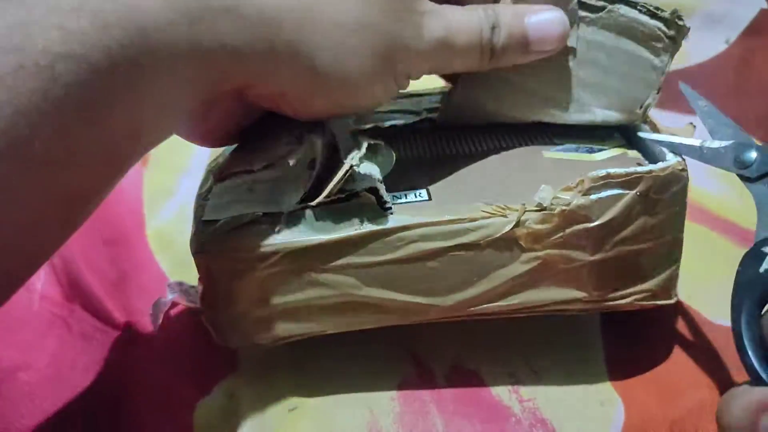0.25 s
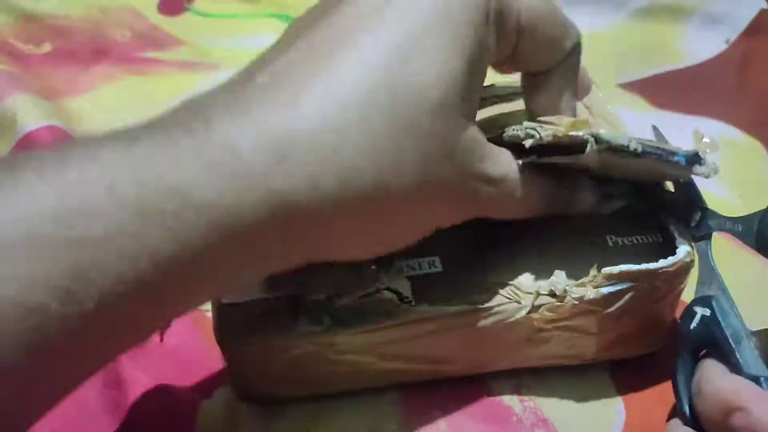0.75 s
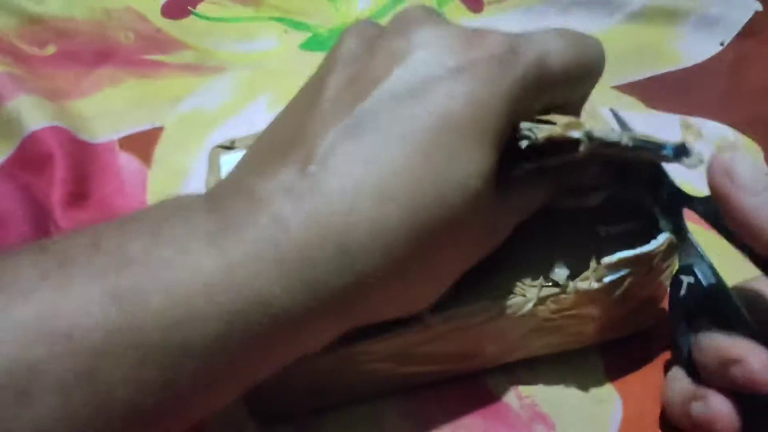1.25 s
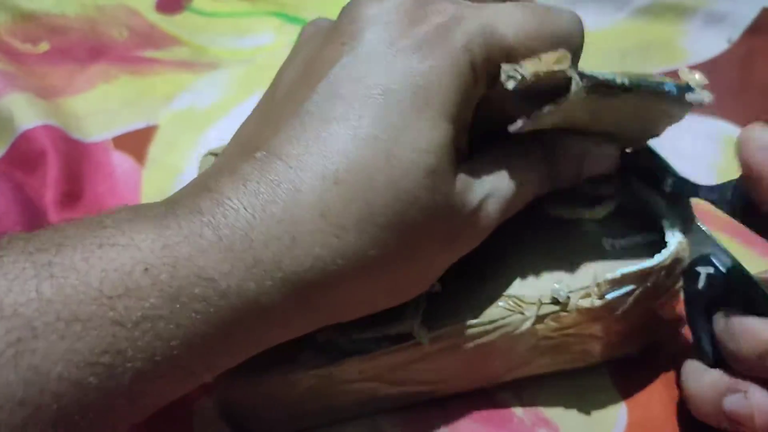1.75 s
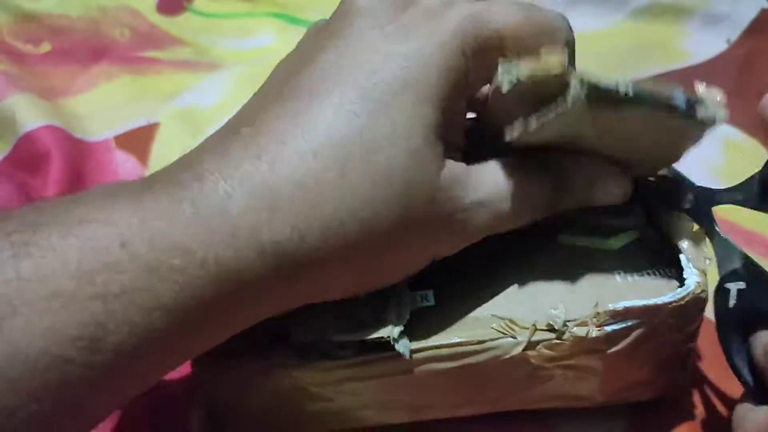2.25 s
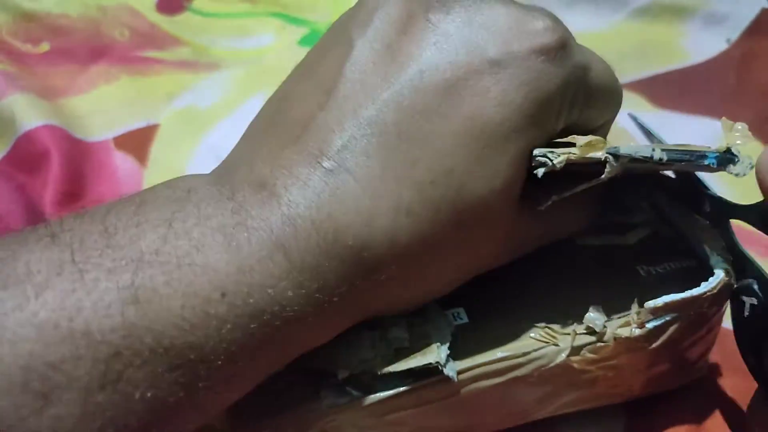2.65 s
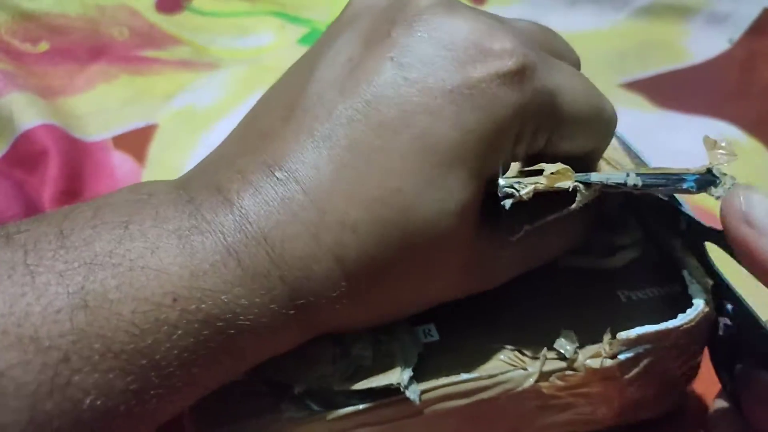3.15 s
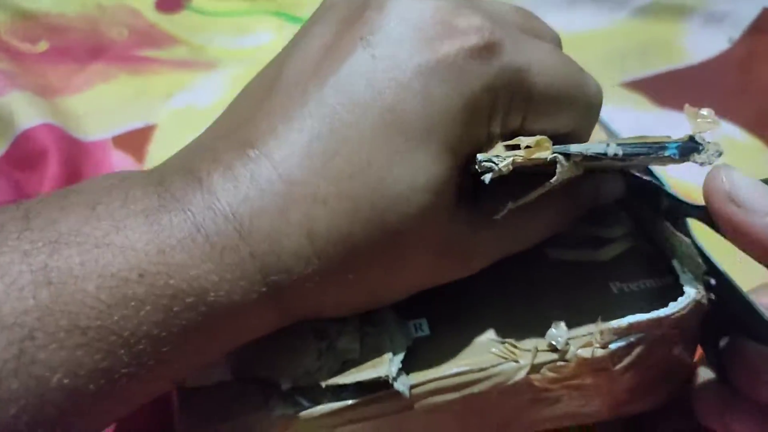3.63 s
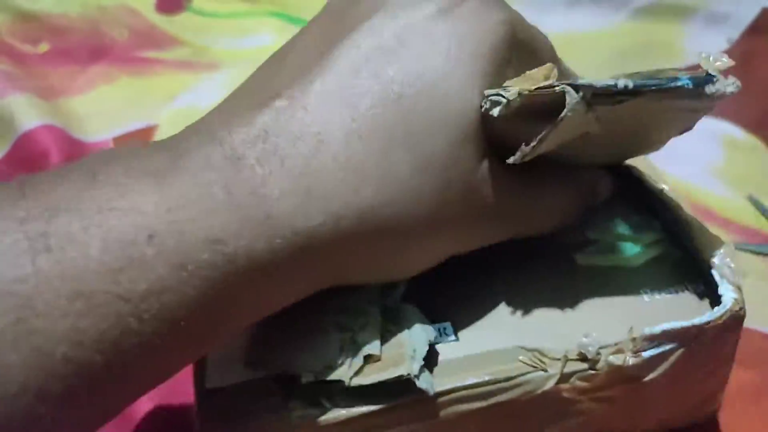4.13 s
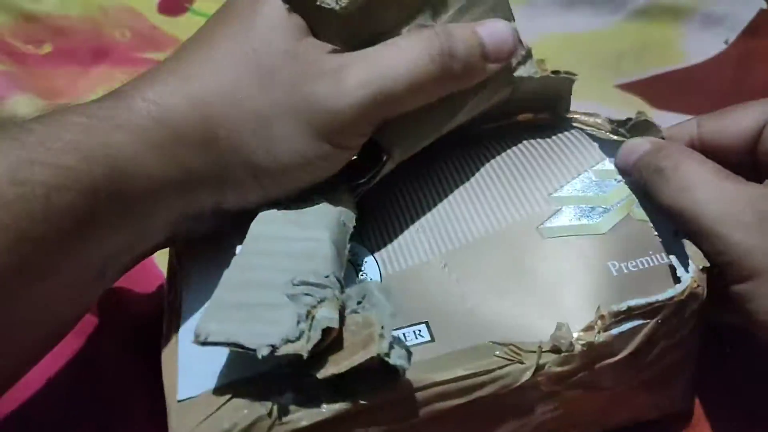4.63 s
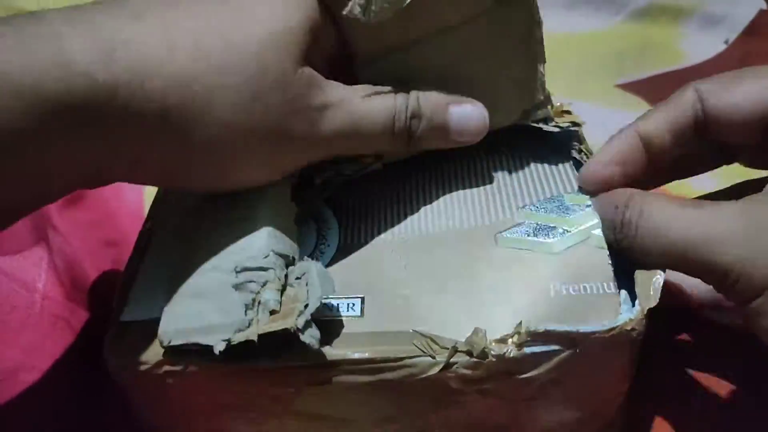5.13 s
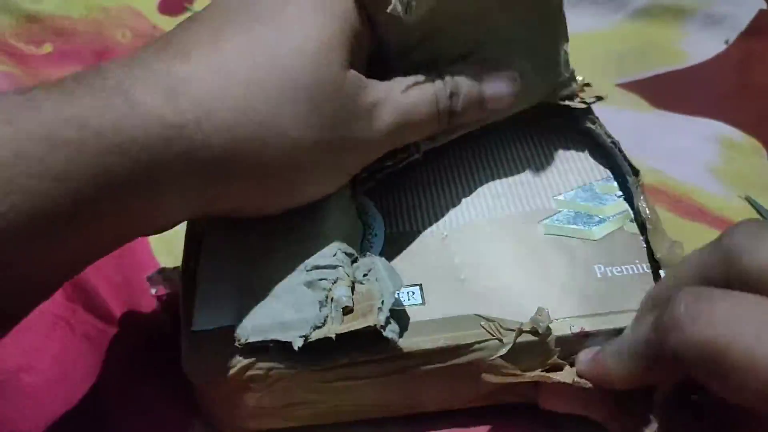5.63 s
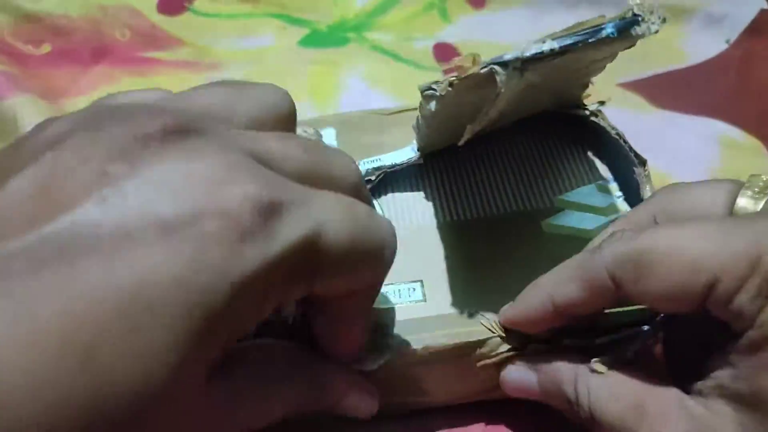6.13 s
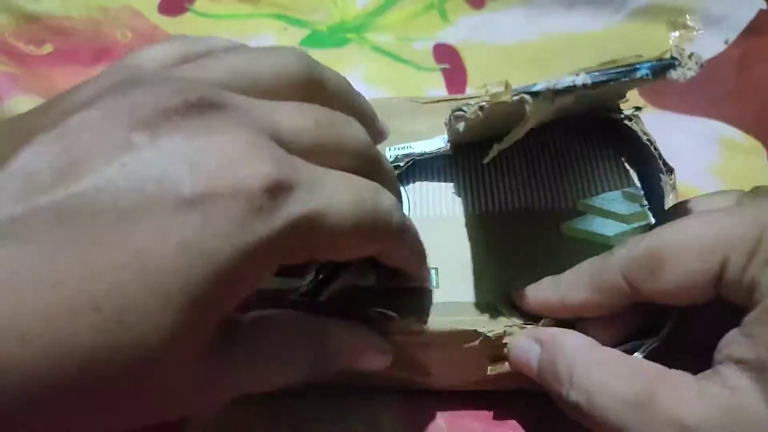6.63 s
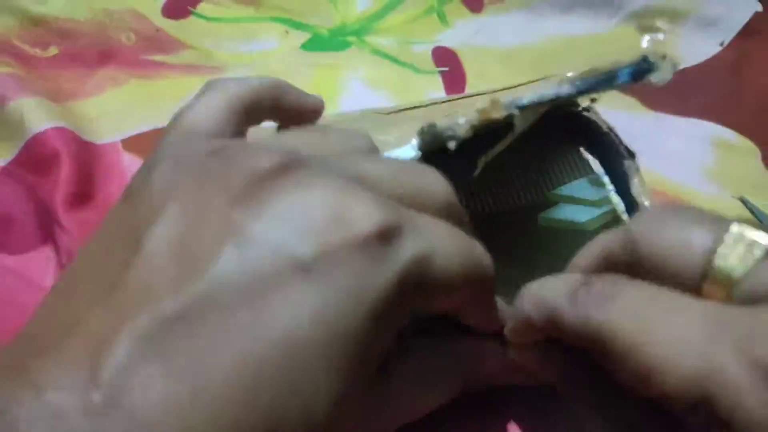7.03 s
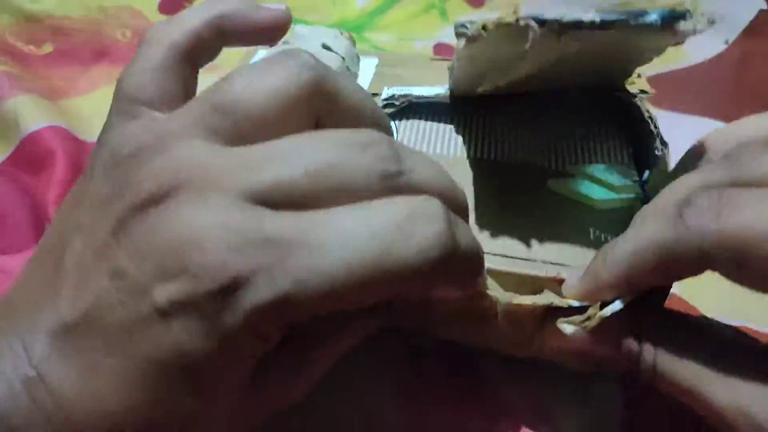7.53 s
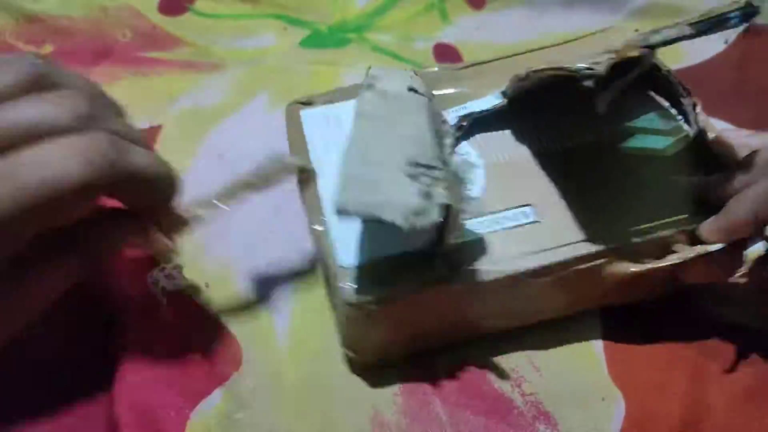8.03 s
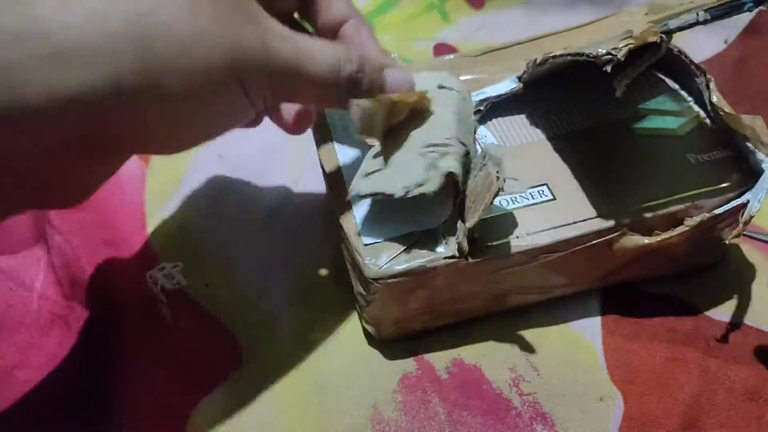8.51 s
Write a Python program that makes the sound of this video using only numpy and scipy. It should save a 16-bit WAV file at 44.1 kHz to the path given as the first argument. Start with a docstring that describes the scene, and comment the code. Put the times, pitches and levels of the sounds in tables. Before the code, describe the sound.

Hands pull apart a small taped cardboard parcel up close: faint rubbing, then sharp tape snaps, short crackling rips and dull box bumps in irregular bursts.

```python
"""A small taped cardboard parcel on a bed is pulled open by hand, close to a phone with two microphone ports.
Rips and rubs are trains of tiny fractures ringing tape film and box; snaps, ticks and knocks are short rings.
Crinkles buckle in quick steps, bumps thud the box wall and its air, a freed flap twangs once as a sine.
Behind them: a short diffuse tail of a small soft room and faint steady coloured noise."""
import sys
import numpy as np
from scipy import signal
from scipy.fft import rfft, irfft, next_fast_len
from scipy.io import wavfile
from scipy.ndimage import uniform_filter1d

SR = 44100
rng = np.random.default_rng(int(sys.argv[2]) if len(sys.argv) > 2 else 0)


def inscribe(sig):
    """Save sig as 16-bit PCM at rate SR to the path in sys.argv[1].

    A 1-D sig is mono; a 2-D sig holds one channel per row.
    Samples are clipped to [-1, 1] before scaling.
    """
    pcm = np.round(np.clip(np.atleast_2d(sig).T, -1, 1) * 32767)
    wavfile.write(sys.argv[1], SR, pcm.astype(np.int16))


N = 386757
TIME_S = np.arange(N) / SR
TOP_HZ = 16100

# cracks running through tape and board: start_s, rise_s, fall_by_20_db_s, tape_db, board_db
RIP_EVENTS = [(1.542, 0.01, 0.05, -42, -42.5), (1.625, 0.0086, 0.08, -44, -48),
              (2.14, 0.02, 0.0363, -52, -46), (2.323, 0.013, 0.02, -46.5, -46.5),
              (3.8, 0.021, 0.0937, -31.5, -29.5), (4.334, 0.089, 0.1546, -37, -51),
              (4.496, 0.053, 0.0346, -30, -34), (5.428, 0.013, 0.1, -33.5, -43),
              (5.485, 0.012, 0.065, -33.5, -37.5), (6.534, .003, 0.065, -40.5, -36),
              (7.498, 0.011, 0.0659, -33.5, -50.5), (7.707, 0.051, 0.0539, -26.5, -38),
              (7.875, 0.014, 0.0958, -33, -36), (8.045, 0.026, 0.0374, -39, -35.5)]
# single snaps of tape and creased board: time_s, tape_db, board_db
SNAP_EVENTS = [(1.3845, -42, -69), (1.4385, -49, -45), (1.9025, -38.5, -42.5), (1.974, -47, -40),
               (2.014, -48.5, -55.5), (2.136, -46, -48), (2.18, -52, -59), (2.394, -47.5, -57),
               (2.903, -46, -52.5), (3.4068, -50, -48), (3.505, -58, -44), (3.7847, -41.5, -45),
               (3.8233, -24, -25), (3.847, -38, -28.5), (4.3213, -37.5, -43), (4.5185, -24.5, -40.5),
               (4.524, -23.5, -40), (4.5662, -32.5, -42), (4.6443, -40.5, -53), (4.696, -37, -47.5),
               (4.848, -54, -59), (5.001, -49, -49), (5.1891, -38.5, -51), (5.263, -47, -39.5),
               (5.381, -52, -40), (5.407, -39, -38), (5.4323, -19.5, -27), (5.4924, -25.5, -25.5),
               (5.98, -38, -44.5), (6.056, -44, -45.5), (6.36, -45.5, -49.5), (6.4195, -37, -51.5),
               (6.469, -39, -55.5), (6.757, -44, -52), (6.826, -52.5, -54), (7.056, -39, -61),
               (7.219, -33, -58), (7.2938, -36.5, -39), (7.5697, -23, -48), (7.639, -17.5, -40),
               (7.745, -22.5, -48), (7.7569, -21, -32.5), (7.8897, -23.5, -32), (8.0671, -36, -34)]
# resting hands, as level of their faint rub: time_s, tape_db, board_db
GRIP_LEVELS = [(0, -68, -60.5), (.46, -80, -86), (0.619, -100, -100), (0.657, -65.5, -68),
               (1.499, -64.5, -64.5), (1.78, -74.5, -68), (2.0, -60.5, -56), (2.29, -78.5, -93),
               (2.359, -67, -57), (2.8, -67.5, -71.5), (3.7, -67.5, -69), (4.5, -61.5, -61),
               (5.6, -69, -66), (5.84, -66, -68.5), (7.45, -67, -71), (7.901, -55, -55),
               (8.33, -63.5, -70.5)]
# finger slipping over tape and board: start_s, length_s, tape_db, board_db
STROKE_EVENTS = [(0.107, 0.068, -72, -57.5), (0.295, 0.13, -64, -53), (0.743, 0.064, -50, -57),
                 (0.83, 0.15, -52, -62), (1.323, 0.14, -55.5, -66), (1.82, 0.17, -64, -67),
                 (2.804, 0.069, -50.5, -62), (2.946, 0.051, -53.5, -55), (3.03, 0.097, -57, -81),
                 (3.209, 0.083, -58, -55.5), (3.355, 0.088, -58.5, -56.5), (3.489, 0.079, -56, -57),
                 (4.07, 0.079, -56, -53), (4.66, 0.072, -50.5, -58), (4.786, 0.24, -59, -52),
                 (5.011, 0.15, -58.5, -54), (5.116, 0.039, -56, -52.5), (5.188, 0.1, -52, -45.5),
                 (5.348, 0.077, -50, -50.5), (5.552, 0.073, -38, -45.5), (5.72, 0.061, -45, -50.5),
                 (5.951, 0.0805, -53.5, -52.5), (6.148, 0.094, -49, -51), (6.238, 0.12, -46.5, -43),
                 (6.356, 0.069, -48.5, -63.5), (6.676, 0.068, -49, -56), (6.892, 0.092, -56, -54.5),
                 (7.217, 0.07, -50.5, -62), (7.271, 0.085, -51.5, -53), (7.601, 0.15, -47.5, -57),
                 (8.387, 0.058, -54.5, -68.5), (8.554, 0.065, -48, -59.5), (8.69, 0.092, -54, -62)]
# thin ticks of loose tape film, board still: time_s, level_db
TICK_EVENTS = [(0.919, -46), (2.786, -53), (3.154, -53.5), (3.541, -51), (4.4218, -36.5), (5.477, -31),
               (5.5404, -36), (5.7143, -35), (5.9415, -40), (6.191, -44), (6.3975, -44), (6.664, -36.5),
               (7.2675, -48), (7.451, -54), (8.051, -38), (8.3113, -44), (8.5904, -40), (8.7245, -46.5)]
# dull knocks and creaks of the board under a fingertip: time_s, level_db
KNOCK_EVENTS = [(0.809, -53.5), (1.72, -50), (1.937, -46.5), (2.065, -47.5), (2.083, -49.5), (2.345, -36.5),
                (2.507, -50), (3.013, -53.5), (3.666, -45.5), (4.805, -50), (5.2, -37.5), (5.332, -48),
                (6.011, -46), (6.768, -48), (7.106, -51.5), (7.161, -49), (7.336, -44.5), (8.164, -46.5),
                (8.2444, -42)]
# soft bumps of the box: time_s, level_db
BUMP_EVENTS = [(1.026, -49), (1.122, -55), (1.176, -48), (1.551, -42), (1.635, -48.5), (2.900, -48.5),
               (3.828, -37), (4.088, -47), (4.172, -50), (4.587, -42), (6.053, -52), (6.538, -47.5),
               (6.645, -58.5), (6.915, -58), (7.895, -40), (8.066, -40), (8.587, -57), (8.67, -59.5)]
# tape film colour: freq_hz, gain_db
TAPE_COLOUR = [(900, -23.5), (2000, -5.5), (3200, -2.5), (4100, -3.5), (5100, -9), (6400, 1.5), (8200, -1),
               (10700, -9), (13000, -5), (15800, -14)]
# cardboard box resonances: freq_hz, width_hz, gain_db
BOX_RESONANCES = [(252, 107, -1.5), (598, 132, -3), (815, 218, -0.5), (1390, 360, -6), (2196, 510, -6.5),
                  (3060, 600, -9.5), (3980, 340, -12)]
# sliding finger stirs mostly the middle resonances: freq_hz, gain_db
RUB_COLOUR = [(400, -2.5), (650, 1), (1100, -1.3)]
# tick colour relative to tape, thinner than a snap: freq_hz, gain_db
LOOSE_FILM_COLOUR = [(2000, -9), (7000, 2.5)]
# soft fingertip hardly stirs the upper resonances: freq_hz, gain_db
FINGERTIP_COLOUR = [(1700, 1), (5000, -19)]
# difference between what the two ports hear: freq_hz, side_minus_mid_db
PORT_WIDTH = [(250, -17.5), (1100, -6), (4000, -1)]
# port colour: freq_hz, left_minus_right_db
PORT_BALANCE = [(300, -1.5), (2000, 1), (8000, -1), (12500, 5)]
# still-room noise colour: freq_hz, gain_db
STILL_COLOUR = [(60, 11), (700, -18), (15000, -31)]

# stroke swells for a share of its length, then has faded by this much at its end
STROKE_RISE_SHARE, STROKE_FALL_DB = 0.28, 14.5
# grip rub ducks before a stroke, rip or snap: lead of the dip, its Gaussian width, its depth
STICK_LEAD_S, STICK_WIDTH_S, STICK_DB = 0.023, 0.018, -3
# grip bends the board: random resonance shift (share), fading out with frequency
BEND_SHARE, BEND_FADE_HZ = 0.065, 3000
FLAP_START_S, FLAP_HZ, FLAP_DB, FLAP_T60_S = 5.549, 98, -39, 0.17
ROOM_DB, ROOM_LOW_T60_S, ROOM_HIGH_T60_S = -16.5, 0.17, 0.076
STILL_DB = -83


def rips(tape, box):
    """Tearing force swells, then dies away, driving jerky fibre fractures in tape and board."""
    tape_force, board_force = np.zeros((2, N))
    for start_s, rise_s, fall_s, tape_db, board_db in RIP_EVENTS:
        t = TIME_S - start_s
        rise = np.clip(t / rise_s, 0, 1) ** 2
        force = rise * db_to_gain(-20 * np.maximum(t - rise_s, 0) / fall_s)
        tape_force += db_to_gain(tape_db) * force
        board_force += db_to_gain(board_db) * force
    jerks = unit_rms(db_to_gain(2.38 * random_walk(240, count=4096)))
    tape_breaks = fractures(rate_hz=5000, spread_db=3.0, t60_s=0.0075, gain=tape)
    board_breaks = fractures(rate_hz=1800, spread_db=3.5, t60_s=0.014, gain=box)
    return jerks * (tape_force * tape_breaks + board_force * board_breaks)


def snaps(tape, box, onset_s=0.0006, tape_t60_s=0.017, board_t60_s=0.014,
          shiver_db=-25, shiver_t60_s=0.12, spot_db=3.0, pan_db=1.8):
    """A crease or tape edge lets go with a sharp crack, then a brief shiver of the sheet."""
    lead_s = 0.01
    out, t = np.zeros((2, N)), TIME_S[:4096] - lead_s
    onset, after_s = np.exp(np.minimum(t, 0) / onset_s), np.maximum(t, 0)
    shiver = db_to_gain(shiver_db) * decay(after_s, shiver_t60_s)
    tape_envelope = onset * (decay(after_s, tape_t60_s) + shiver)
    board_envelope = onset * (decay(after_s, board_t60_s) + shiver)
    for time_s, tape_db, board_db in SNAP_EVENTS:
        spot = spot_colour(spot_db)
        crack = burst_gain(tape_db, 0.005) * ring(tape_envelope, tape * spot)
        knock = burst_gain(board_db, 0.005) * ring(board_envelope, box * spot)
        pan = db_to_gain(pan_db * rng.standard_normal() * np.array([[1], [-1]]))
        mix_in(out, time_s - lead_s, pan * (crack + knock))
    return out


def handling(tape, box):
    """Fingers slide in fits and starts over tape and board and flick small creases."""
    tape_level, board_level = sliding() * db_to_gain(2.52 * random_walk(45))
    rubbed = box * gain_curve(RUB_COLOUR)
    # dense fractures merge into a smooth rub
    slide = fractures(rate_hz=12000, spread_db=2.5, t60_s=0.010, gain=tape)
    scrape = fractures(rate_hz=900, spread_db=3.5, t60_s=0.016, gain=rubbed)
    creases = crinkles(rate_hz=45, t60_s=0.0083, gain=tape)
    creaks = crinkles(rate_hz=45, t60_s=0.016, gain=rubbed)
    tape_rub = db_to_gain(0.5) * slide + db_to_gain(-1.5) * creases
    board_rub = db_to_gain(-1.5) * (scrape + creaks)
    return tape_level * tape_rub + board_level * board_rub


def sliding():
    """Rub levels of tape and board: the resting grip sticks just before an event; strokes swell and fade."""
    t, stuck = TIME_S[:4096], np.zeros((1, N))
    halt = np.exp(-((t[::-1] - STICK_LEAD_S) / STICK_WIDTH_S) ** 2)
    for start_s, *_ in STROKE_EVENTS + RIP_EVENTS + SNAP_EVENTS:
        mix_in(stuck, start_s - t[-1], halt[None])
    time_s, *levels_db = np.transpose(GRIP_LEVELS)
    grip_db = np.array([np.interp(TIME_S, time_s, db) for db in levels_db])
    power = db_to_gain(grip_db + STICK_DB * np.minimum(stuck, 1)) ** 2
    for start_s, length_s, tape_db, board_db in STROKE_EVENTS:
        # the fade runs on past the nominal end
        progress = TIME_S[:int(3 * length_s * SR)] / length_s
        swell = np.minimum(progress / STROKE_RISE_SHARE, 1)
        fall = np.maximum(progress - STROKE_RISE_SHARE, 0) / (1 - STROKE_RISE_SHARE)
        stroke = db_to_gain([[tape_db], [board_db]]) * swell * db_to_gain(-STROKE_FALL_DB * fall)
        mix_in(power, start_s, stroke ** 2)
    return np.sqrt(power)


def fractures(rate_hz, spread_db, t60_s, gain, wander_db=8.0, wander_hz=21.98, spot_db=3.5, spots=5):
    """Tiny breaks at random moments, many small, few large; each spot's level wanders on its own. Rms near 1."""
    t, total = TIME_S[:1024], 0
    for _ in range(spots):
        hit = np.flatnonzero(rng.random(N) < rate_hz / spots / SR)
        size = np.minimum(rng.exponential(size=len(hit)), 4)
        wander = random_walk(wander_hz)[hit]
        breaks = np.zeros((1, N))
        breaks[0, hit] = (-1.) ** hit * db_to_gain(spread_db * size + wander_db * wander)
        response = ring(decay(t, t60_s), bent(gain) * spot_colour(spot_db))
        total = total + signal.oaconvolve(breaks, response, axes=1)[:, :N]
    # even out the summed level over a short window
    power = uniform_filter1d(np.mean(total ** 2, axis=0), size=2600)
    return total / np.sqrt(np.maximum(power, 0) + power.mean() / 100)


def crinkles(rate_hz, t60_s, gain, spread_db=6.0, spot_db=4.5, step_s=0.004):
    """Creases buckle at random moments, each in three quick steps with its own colour. Rms 1."""
    out, t = np.zeros((2, N)), TIME_S[:2048]
    for slot_s in np.arange(0, TIME_S[-1], 1 / rate_hz):
        steps_s = np.cumsum(rng.exponential(step_s, 3))
        envelope = sum(rng.random() * (t >= late_s) * decay(np.abs(t - late_s), t60_s) for late_s in steps_s)
        size = db_to_gain(spread_db * np.clip(rng.standard_normal(), -2, 2))
        crease = size * ring(envelope, bent(gain) * spot_colour(spot_db))
        mix_in(out, slot_s + 2 * rng.random() / rate_hz, crease)
    return unit_rms(out)


def flex(x, depth_db=3.5, shift_hz=22, bands=14):
    """The sheets keep bending, so each part of the spectrum swells and sinks on its own."""
    size = next_fast_len(N)
    spectrum, log_hz = rfft(x, size), np.log(bins_hz(size))
    centres = np.log(np.geomspace(200, TOP_HZ, bands))
    out = 0
    for weights in np.eye(bands):
        band = irfft(spectrum * np.interp(log_hz, centres, weights), size)[:, :N]
        out = out + band * db_to_gain(depth_db * random_walk(shift_hz))
    return out * np.std(x) / np.std(out)


def ticks(tape, t60_s=0.013):
    """A bit of loose film flips over with a dry, very short click."""
    out, film = np.zeros((2, N)), tape * gain_curve(LOOSE_FILM_COLOUR)
    for time_s, level_db in TICK_EVENTS:
        click = ring(decay(TIME_S[:2048], t60_s), film * spot_colour(spread_db=5.0))
        mix_in(out, time_s, burst_gain(level_db, 0.005) * click)
    return out


def knocks(box, t60_s=0.018):
    """The board gives under a fingertip with a short hollow tock."""
    out, dull = np.zeros((2, N)), box * gain_curve(FINGERTIP_COLOUR)
    for time_s, level_db in KNOCK_EVENTS:
        tock = ring(decay(TIME_S[:4096], t60_s), bent(dull) * spot_colour(spread_db=2.0))
        mix_in(out, time_s, burst_gain(level_db, 0.005) * tock)
    return out


def bumps(t60_s=0.12, push_s=0.0022, wall_hz=215, wall_width_hz=106.0, air_hz=95.0, air_db=-4):
    """A soft push of the hand thuds the box wall and the air inside."""
    out, t = np.zeros((2, N)), TIME_S[:8192]
    envelope = (1 - np.exp(-t / push_s)) * decay(t, t60_s)
    usual_db = np.mean([level_db for _, level_db in BUMP_EVENTS])
    for time_s, level_db in BUMP_EVENTS:
        # a harder push stirs relatively less of the deep air resonance
        air_mode = (air_hz, 45, air_db - (level_db - usual_db))
        wall_and_air = resonances([(wall_hz, wall_width_hz, 0), air_mode])
        mix_in(out, time_s, burst_gain(level_db, 0.02) * ring(envelope, bent(wall_and_air)))
    return out


def flap(release_s=0.049, left_minus_right_db=-7):
    """The flap slides off the finger and swings at one low pitch."""
    t = np.maximum(TIME_S - FLAP_START_S, 0)
    swing = (1 - np.exp(-t / release_s)) ** 2 * decay(t, FLAP_T60_S)
    tone = np.sqrt(2) * swing / swing.max() * np.sin(2 * np.pi * FLAP_HZ * t)
    pan_db = np.array([[left_minus_right_db], [-left_minus_right_db]]) / 2
    return tone * db_to_gain(FLAP_DB + pan_db)


def room(x, first_echo_s=0.006, split_hz=3500):
    """Short diffuse tail; bedding soaks up the treble first."""
    t = TIME_S[:16384]
    noise = rng.standard_normal((2, len(t)))
    low = signal.sosfilt(signal.butter(2, split_hz, fs=SR, output="sos"), noise)
    high = signal.sosfilt(signal.butter(2, split_hz, "high", fs=SR, output="sos"), noise)
    tail = (low * decay(t, ROOM_LOW_T60_S) - high * decay(t, ROOM_HIGH_T60_S)) * (t > first_echo_s)
    return signal.oaconvolve(x, unit_rms(tail) / np.sqrt(len(t)), axes=1)[:, :N]


def still_room():
    """Faint steady background: coloured noise, independent in each channel."""
    noise = colour(rng.standard_normal((2, N)), gain_curve(STILL_COLOUR))
    return db_to_gain(STILL_DB) * unit_rms(noise)


def ring(envelope, gain):
    """One spot of the parcel at both ports: dense modes as enveloped noise, unit mean energy per port."""
    mid, side = rng.standard_normal((2, 1, len(envelope))) * envelope
    side = colour(side, gain_curve(PORT_WIDTH))
    ports = colour(np.vstack([mid + side, mid - side]), gain)
    return ports / np.sqrt(np.sum(ports ** 2) / 2)


def bent(gain):
    """Same resonances, moved a little up or down by the bending of the board."""
    f = bins_hz()
    shift = BEND_SHARE * rng.standard_normal() * np.exp(-f / BEND_FADE_HZ)
    return np.interp(f * np.exp(shift), f, gain)


def spot_colour(spread_db, count=30):
    """Every crease and patch of the parcel favours its own frequencies."""
    freq_hz = np.geomspace(TOP_HZ / 2 ** 6, TOP_HZ, count)
    return gain_curve(np.column_stack([freq_hz, spread_db * rng.standard_normal(count)]))


def resonances(modes):
    """Gain per frequency of damped resonances, summed in power."""
    f = bins_hz()
    power = 0
    for freq_hz, width_hz, gain_db in modes:
        detune = (f * f - freq_hz * freq_hz) / (f * width_hz)
        power = power + db_to_gain(gain_db) ** 2 / (1 + detune ** 2 / 2) ** 2
    return np.sqrt(power)


def gain_curve(points):
    """Gain per frequency through (freq_hz, gain_db) points, straight over log frequency."""
    freq_hz, gain_db = np.transpose(points)
    return db_to_gain(np.interp(np.log(bins_hz()), np.log(freq_hz), gain_db))


def colour(x, gain):
    """Causal minimum-phase filter with the given gain: rings after a click, never before."""
    cepstrum = irfft(np.log(gain + 1e-5))
    half = len(cepstrum) // 2
    # fold the cepstrum onto positive time
    cepstrum[1:half] *= 2
    cepstrum[half + 1:] = 0
    impulse = irfft(np.exp(rfft(cepstrum)))
    return signal.fftconvolve(x, impulse[None], axes=1)[:, :x.shape[1]]


def bins_hz(size=2048):
    """Frequency grid for colours, kept above zero."""
    return np.maximum(np.fft.rfftfreq(size, 1 / SR), 1)


def random_walk(rate_hz, count=1024):
    """Random levels joined by straight lines; spread near 1."""
    return np.interp(TIME_S * rate_hz + rng.random(), np.arange(count), rng.standard_normal(count))


def decay(t, t60_s):
    """Exponential decay, 60 dB in t60_s."""
    return np.exp(-np.log(1000) * t / t60_s)


def db_to_gain(db):
    """Decibels to amplitude gain."""
    return 10 ** (np.asarray(db) / 20)


def burst_gain(level_db, window_s):
    """Gain giving a unit-energy ring the energy of a steady level_db over window_s."""
    return db_to_gain(level_db) * np.sqrt(window_s * SR)


def unit_rms(x):
    """Scale to rms 1."""
    return x / np.sqrt(np.mean(x ** 2) + 1e-18)


def mix_in(out, time_s, x):
    """Add a sound in place at time_s."""
    i = max(int(time_s * SR), 0)
    out[:, i:i + x.shape[1]] += x[:, :max(N - i, 0)]


def scene():
    """Parcel, flap, room tail and faint background."""
    tape, box = gain_curve(TAPE_COLOUR), resonances(BOX_RESONANCES)
    parcel = rips(tape, box) + snaps(tape, box) + flex(handling(tape, box))
    parcel = parcel + ticks(tape) + knocks(box) + bumps()
    return parcel + flap() + db_to_gain(ROOM_DB) * room(parcel) + still_room()


def record(dry):
    """Each port has its own colour; the phone cuts the top."""
    lean = np.sqrt(gain_curve(PORT_BALANCE))
    ports = np.vstack([colour(dry[:1], lean), colour(dry[1:], 1 / lean)])
    return signal.sosfilt(signal.ellip(10, 0.2, 70, TOP_HZ, fs=SR, output="sos"), ports)


dry = scene()
out = record(dry)
inscribe(out)
```